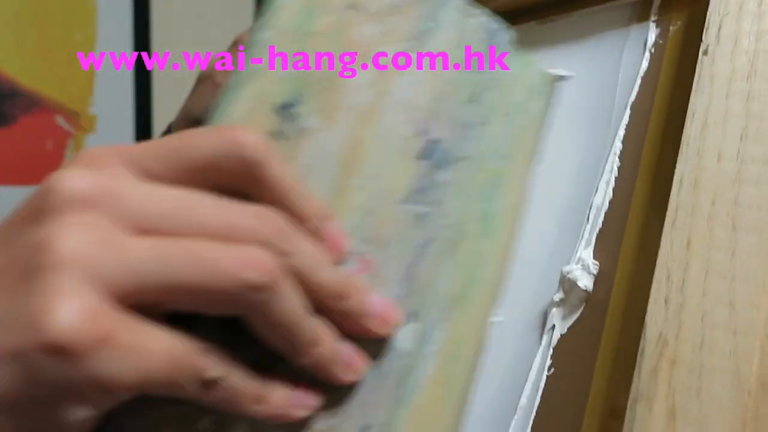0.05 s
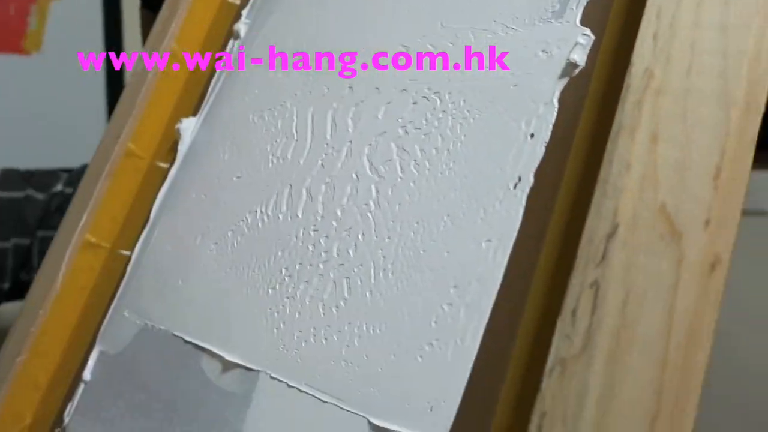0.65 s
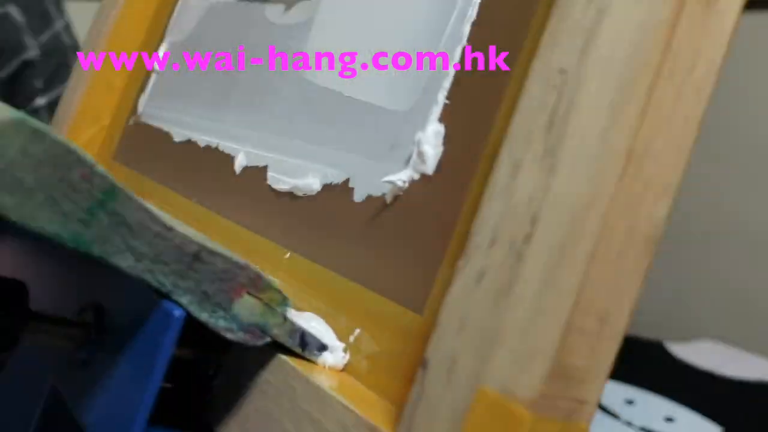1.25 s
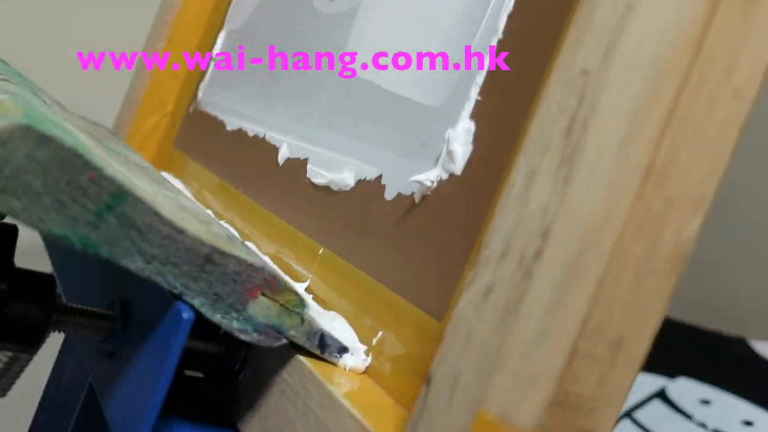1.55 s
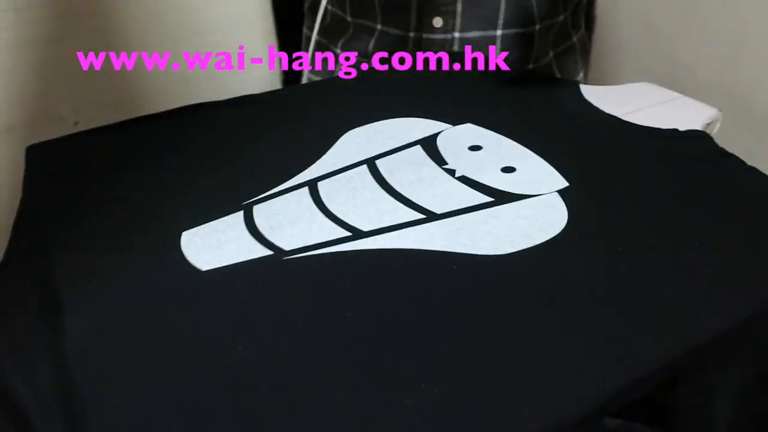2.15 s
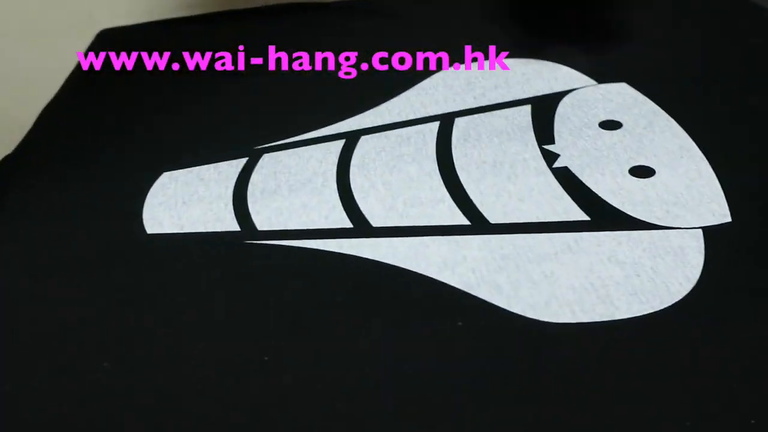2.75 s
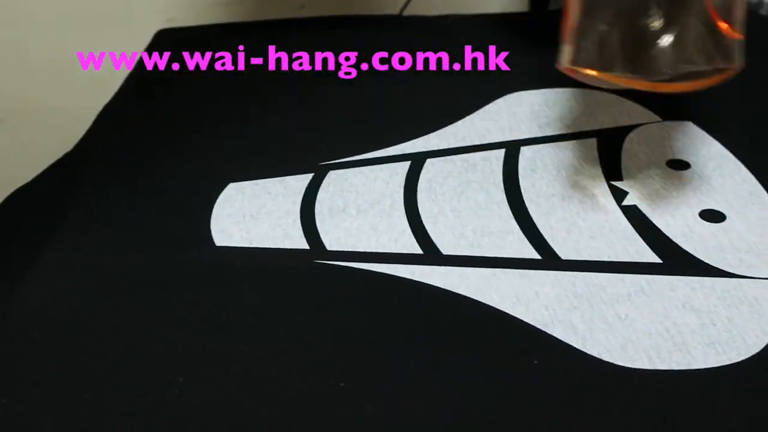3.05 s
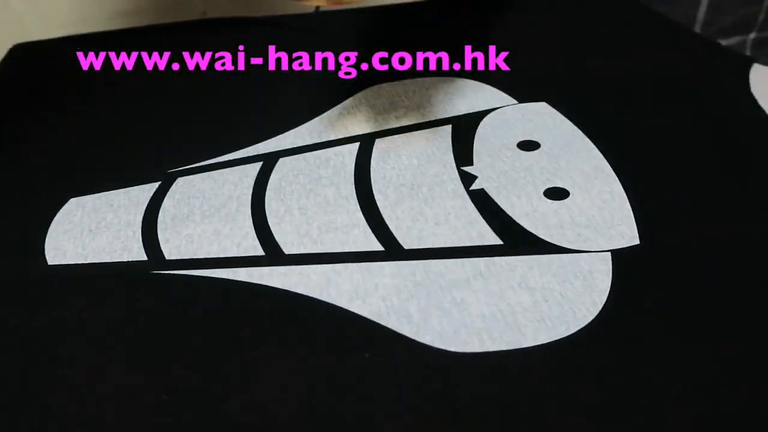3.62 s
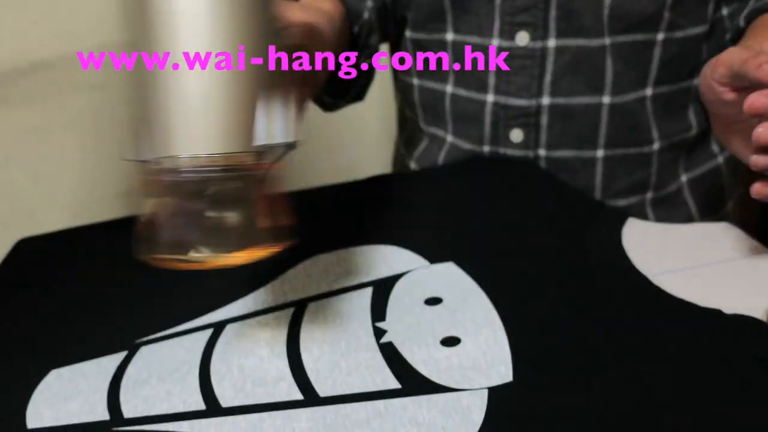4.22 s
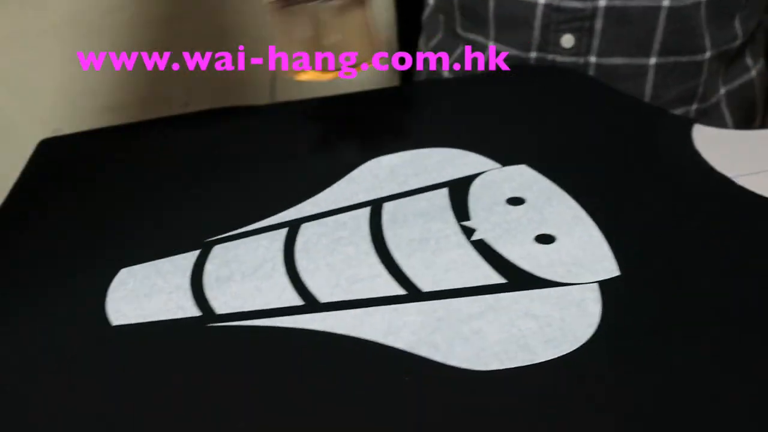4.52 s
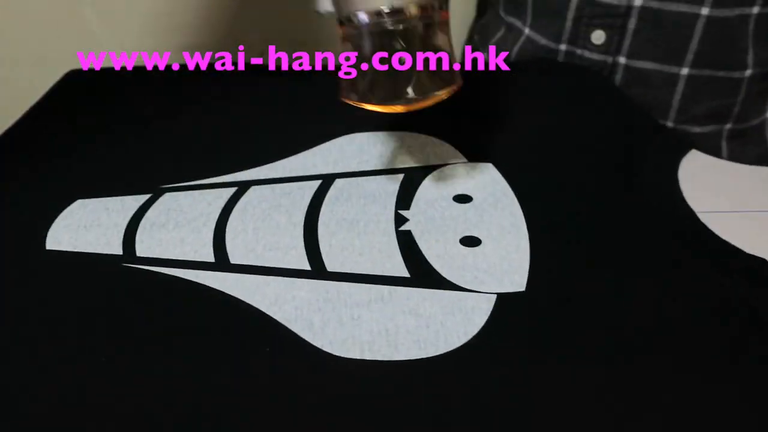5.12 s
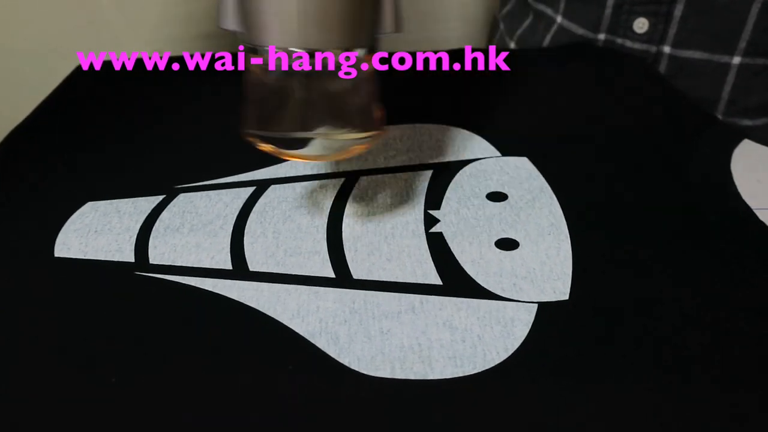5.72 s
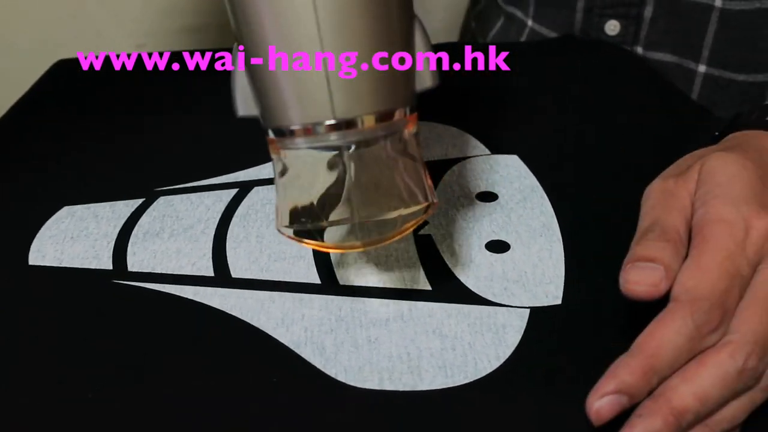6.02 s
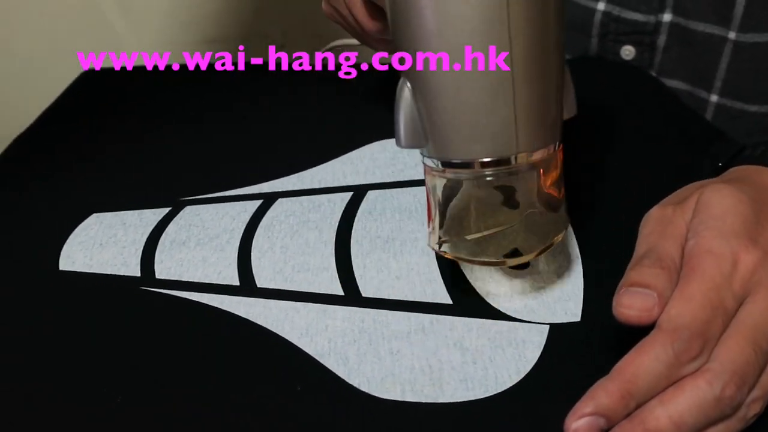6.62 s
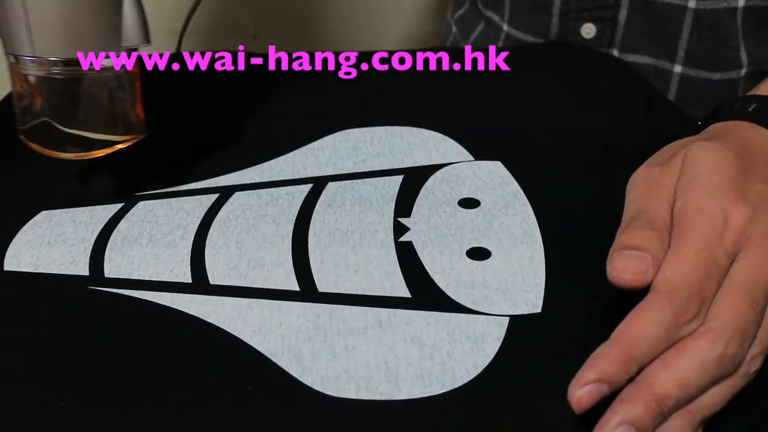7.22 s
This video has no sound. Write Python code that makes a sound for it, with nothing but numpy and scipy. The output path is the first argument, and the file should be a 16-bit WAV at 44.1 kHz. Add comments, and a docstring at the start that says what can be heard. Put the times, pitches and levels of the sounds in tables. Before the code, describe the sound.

A light wooden knock opens the scene, heard close up in a small room with a faint hum. A squeegee scrapes briefly across a printing screen at about 0.3 seconds, with a soft rumble from the taut mesh. It knocks against the wooden frame at 0.5 seconds and clatters again near 0.9. A sharper knock comes at about 1.6 seconds, surrounded by light clicks and rubbing as the frame is lifted.

At about 2 seconds a hair dryer clicks on and spins up rapidly. It runs to the end, around 7.5 seconds, with an airy roar, a hiss and a high fan whine whose tones swell and fade as it is waved about. The sound grows louder and brighter around 3 to 4 seconds. Soft gusts buffet a shirt now and then, most clearly around 6 to 6.7 seconds, when the dryer comes closest.

```python
"""A hair dryer spins up and is waved over a printed shirt: its fan whines in harmonics of the rotation,
turbulence roars in the duct, and the jet hisses and buffets the cloth. The tones swell and fade as
direct and reflected waves interfere. Before it starts, a wooden screen-printing frame is handled:
a squeegee wipes ink, knocks and is set down, and the frame is lifted, its taut mesh rumbling.
The small room hums faintly throughout."""
import sys
import numpy as np
from scipy import signal
from scipy.fft import rfft, irfft
from scipy.io import wavfile

SR = 44100
rng = np.random.default_rng(int(sys.argv[2]) if len(sys.argv) > 2 else 0)


def wav_out(sig):
    """Save sig, one row per channel (or a flat mono array), as 16-bit PCM at SR to the path in sys.argv[1]."""
    wavfile.write(sys.argv[1], SR, np.round(np.clip(np.atleast_2d(sig).T, -1, 1) * 32767).astype(np.int16))


N = 328986
TIME = np.arange(N) / SR
SWITCH_ON_S = 1.952
# poses of the dryer: (start t/s, end t/s, length of the move/s)
OVER_SHIRT, TILTED, HELD_LOW = (2.56, 9, .45), (2.82, 3.94, .057), (5.9, 6.97, .16)
# full rotation rate of the fan, sagging a little after the start: (t/s, f/Hz)
FULL_SPEED = [(2.2, 899), (2.5, 901), (3.3, 895), (3.7, 893), (4.6, 885), (5.7, 889.5), (7.3, 887),
              (7.46, 883)]
# blows on wood: (t/s, frame level/dB, squeegee level/dB, bench level/dB, crack level/dB, rattle/s)
BLOWS = [(0.001, -57.5, -57.5, -57, -61, 0.024), (0.4995, -62, -48.5, -73, -48, 0.0097),
         (0.505, -48, -52, -51.5, -66, 0.042), (0.8472, -64, -65, -74, -64, 0.014),
         (0.862, -66, -69, -60, -71, 0.016), (0.8948, -50.5, -39.5, -55, -56, 0.025),
         (0.919, -53, -57, -51.5, -60, 0.01), (0.926, -49, -62, -42, -62, 0.0054),
         (1.0965, -70, -75, -57.5, -80, 0.0082), (1.5593, -36.5, -53, -78, -51, .005),
         (1.704, -68.5, -76, -87, -60, 0.0088)]


def fan_tones(whine_harmonic=4, beaming_hz=5500, hand_m_per_s=.55, steadying=.733):
    """A rotor radiates harmonics of its rotation; short, weakly aimed waves flutter most. In stereo."""
    # (harmonic number, level/dB, change when tilted/dB, change when held low/dB)
    harmonics = [(1, -71.5, 2, 0.5), (2, -70, -1, 1), (3, -79, -10, 12), (4, -51, -0.5, -0.5),
                 (5, -59, 1.5, -4), (6, -66.5, 0, -0.5), (7, -50.5, 3.5, -4.5), (8, -64, 1, -3),
                 (9, -66.5, 3.5, 9), (10, -72.5, 6.5, -5), (11, -71, 2, 2), (12, -70.5, 1, -5),
                 (13, -73, 2, -2), (14, -73.5, 0, 2), (16, -75.5, 0, 6), (17, -80, 7, -3)]
    # directivity of the main whine as the aim changes: (t/s, level/dB)
    whine_aim = [(2.2, -5.5), (3.1, 0), (3.82, -1), (4.28, 6.5), (4.42, -8), (4.82, -4.5), (4.93, 3),
                 (6.2, -3.5), (6.9, 1.5), (7.22, -2.5), (7.28, -14), (7.46, -9)]
    # peaks and dips from duct resonances and standing waves in the room:
    # (t/s, harmonic number, half-length/s, level change/dB)
    swells = [(2.05, 4, 0.021, 12.5), (2.103, 4, 0.021, 14), (2.104, 7, 0.059, -13), (2.114, 3, 0.048, 18),
              (2.174, 4, 0.0082, 10.5), (2.25, 8, .2, 6), (2.27, 7, 0.045, -16), (2.45, 6, 0.15, 10),
              (2.727, 7, 0.17, -6.5), (3.172, 7, 0.052, -7), (4.173, 7, .22, -11.5), (4.537, 4, .04, -10),
              (4.643, 7, 0.042, -17), (4.662, 4, 0.029, 7), (4.75, 4, .02, -11), (5.117, 7, 0.044, -17),
              (5.28, 7, 0.04, -16), (5.436, 7, 0.021, -17)]
    tilted, low, far = during(*TILTED), during(*HELD_LOW), 1 - during(*OVER_SHIRT)
    waving = 1 - steadying * during(HELD_LOW[0], 2 * TIME[-1], HELD_LOW[2])  # calmer once lowered
    angle = fan_angle()
    travel_m = np.cumsum(hand_m_per_s * waving * (1 + .2 * drift(1.59))) / SR
    run_up_db = 13 * np.log10(run_up())  # times k below: higher harmonics enter later
    out = np.zeros((2, N))
    for k, db, tilted_db, low_db in harmonics:
        hz = k * np.mean(FULL_SPEED, axis=0)[1]
        aim_db = tilted_db * tilted + low_db * low
        aim_db += sum(change_db * swell(s, half_s, half_s)
                      for s, harmonic, half_s, change_db in swells if harmonic == k)
        if k == whine_harmonic:
            aim_db += in_time(whine_aim)
        far_db = -9 if k <= 2 else -2
        level_db = db + aim_db + k * run_up_db + far * far_db + 1.32 * drift(22)
        reflected_share = .27 * np.sqrt(waving) * min(hz / beaming_hz, 2) * from_db(-.72 * aim_db)
        flutter = interference(hz, travel_m, reflected_share)
        wave = np.real(flutter * np.exp(1j * (k * angle + rng.uniform(0, 2 * np.pi))))
        pan_db = .1 * min(hz / beaming_hz, 1) * drift(4.5)
        out += np.sqrt(2) * wave * from_db([level_db + pan_db, level_db - pan_db])
    return out


def fan_angle(wobble=.000912, wander=.000597):
    """Phase is the integral of the rotation rate, which rises, sags and wavers."""
    turns_per_s = in_time(FULL_SPEED) * run_up() * (1 + wobble * drift(24.7) + wander * drift(3))
    return 2 * np.pi * np.cumsum(turns_per_s) / SR


def run_up(time_constant_s=.111):
    """Steady torque against quadratic air drag: the share of full speed follows a tanh."""
    return np.maximum(np.tanh((TIME - SWITCH_ON_S) / time_constant_s), 1e-6)


def interference(hz, travel_m, share, sound_m_per_s=343):
    """Superposition: a direct wave beats against reflections whose paths change as the hand travels."""
    # paths by table, wall and body: (change of length per unit of hand travel, relative amplitude)
    paths = [(1.2, 1.4), (-.8, 0.57), (.45, 0.56)]
    wavelengths = travel_m * hz / sound_m_per_s
    reflected = sum(gain * np.exp(2j * np.pi * (slant * wavelengths + rng.random()))
                    for slant, gain in paths)
    mean_power = 1 + share ** 2 * sum(gain ** 2 for _, gain in paths)
    return (1 + share * reflected) / np.sqrt(mean_power)


def dryer_noise(buzz_hz=400, buzz_db=-81, delay_s=.017):
    """Flow noise and the motor's mains buzz set in just after the switch closes."""
    running = np.clip((TIME - SWITCH_ON_S - delay_s) * 20, 0, 1)
    buzz = np.sqrt(2) * from_db(buzz_db + 2 * drift(.62)) * np.sin(2 * np.pi * buzz_hz * TIME)
    airflow = duct_roar() + nozzle_hiss() + cloth_buffeting()
    return running * (early_reflections(airflow) + buzz)


def duct_roar(resonant_db=-2, broadband_db=-3):
    """Turbulence excites the resonances of the air passage, louder as the dryer comes closer."""
    # duct resonances: (f/Hz, bandwidth/Hz, level/dB)
    modes = [(512, 48, -14.5), (748, 20.4, -5.5), (919, 25, -8.5), (1125, 95, -10.5), (1570, 410, -24.5),
             (1814, 420, -12), (1950, 250, -11.5), (2352, 93, -1), (2750, 215, 0), (3118, 89, 3.5),
             (3385, 420, -5.5)]
    # turbulence spectrum: (f/Hz, level/dB)
    spectrum = [(100, -53), (300, -28), (700, -25), (1400, -16), (2100, -9), (2400, -6.5), (3200, 1),
                (3700, -6.5), (4600, -12.5), (6500, -21), (15000, -42)]
    # strength of the roar with changing distance: (t/s, level/dB)
    closeness = [(2.1, -56), (2.3, -57.5), (2.55, -57.5), (2.85, -51.5), (2.96, -55), (3.17, -51),
                 (3.4, -53), (4.27, -50.5), (4.45, -53.5), (4.98, -51), (5.2, -52.5), (5.95, -49),
                 (6.75, -48.5), (7.05, -52.5), (7.24, -49.5), (7.46, -53.5)]
    level_db = in_time(closeness) + 20 * np.log10(run_up()) + .95 * drift(25) + .48 * drift(5.8)
    roar = from_db(resonant_db) * resonant_noise(modes) + from_db(broadband_db) * noise(spectrum)
    return from_db(level_db) * roar


def nozzle_hiss(jet_db=-54, rim_db=-72):
    """Treble is directional: jet hiss and rim sizzle grow as the nozzle tilts towards the listener."""
    # jet spectrum: (f/Hz, level/dB)
    spectrum = [(500, -16.5), (2000, 3.5), (4000, -4.5), (5000, 0.5), (5900, 3.5), (6800, 3.5), (8400, 1),
                (9600, 3.5), (10400, -2), (11500, 1), (12900, -3), (14300, 0), (16000, -3.5)]
    # rim resonances: (f/Hz, bandwidth/Hz, level/dB)
    rim_modes = [(10500, 570, 1), (11670, 800, 1)]
    tilted, far = during(*TILTED), 1 - during(*OVER_SHIRT)
    jet = from_db(jet_db + 1.3 * tilted - far + 1.25 * drift(11)) * noise(spectrum)
    rim = from_db(rim_db + 11 * tilted) * resonant_noise(rim_modes)
    return run_up() ** 1.5 * (jet + rim)


def cloth_buffeting(steady_db=-78, flapping_db=1.5):
    """The jet strikes the shirt; its steady rumble and its gusts add in power."""
    # the jet catches the cloth: (t/s, half-length/s, level/dB)
    gusts = [(2.91, 0.08, -68.5), (3.13, .07, -65.5), (3.676, 0.31, -67.5), (4.1, 0.41, -74.5),
             (4.957, 0.072, -73), (5.326, 0.13, -74), (5.556, 0.074, -70), (6.195, 0.2, -64),
             (6.534, 0.2, -69.5), (7.205, 0.046, -79)]
    # buffeting spectrum: (f/Hz, level/dB)
    spectrum = [(40, -33), (110, -25), (180, 6), (255, 2.5), (420, 8.5), (700, -6), (2000, -35)]
    power = (from_db(steady_db) * run_up()) ** 2
    power += sum((from_db(db) * swell(s, half_s, half_s)) ** 2 for s, half_s, db in gusts)
    return np.sqrt(power) * from_db(flapping_db * drift(8)) * noise(spectrum)


def early_reflections(x, share=.26, sway_s=.0002):
    """Comb filtering: nearby surfaces return the sound with delays that vary as the hand moves."""
    out = x.copy()
    oversampled = signal.resample_poly(x, 4, 1)
    for lag_s in (.0013, .0034, .0071):
        position = (TIME - lag_s - sway_s * drift(.73)) * SR * 4
        out += share * np.interp(position, np.arange(len(oversampled)), oversampled)
    return out / np.sqrt(1 + 2 * share ** 2)


def wood_knocks(body_db=-5, crack_hz=3000, bass_cut_hz=170):
    """An impulse and a rattle of the joints excite the modes of three bodies, with a dry crack on top."""
    # modes of each body: (f/Hz, level/dB, T60/s)
    frame = [(415, -6.5, 0.037), (532, -6.5, 0.19), (617, -10, 0.23), (700, -8, 0.066), (825, -3, 0.1),
             (1058, -1, 0.051), (1200, -4, 0.031), (1350, -1, 0.038), (1516, -0.5, 0.056),
             (1892, -1, 0.029), (2110, -12, 0.037), (2870, -21, 0.095), (3730, -9.5, 0.016)]
    squeegee = [(474, -3.5, 0.11), (970, -10, 0.094), (1150, -2, .06), (1359, -11.5, 0.059),
                (1702, -1.5, 0.057), (1780, -10, .06), (2070, -6.5, 0.051), (2430, 4, 0.01),
                (3260, -11.5, 0.025), (3950, -6.5, .022), (6140, -14, 0.013)]
    bench = [(181.5, -22.5, 0.49), (257, -49, 0.24), (322, -13, 0.18), (423, -20.5, 0.8), (565, 2, 0.11),
             (580, -16, .45), (733, -4.5, 0.12)]
    crack_lowpass = signal.butter(1, crack_hz, fs=SR, output="sos")
    out = np.zeros(N)
    for s, frame_db, squeegee_db, bench_db, crack_db, rattle_s in BLOWS:
        rattle = decaying_noise(4 * rattle_s)
        force = rattle / np.linalg.norm(rattle)
        force[0] += 1
        for modes, db in ((frame, frame_db), (squeegee, squeegee_db), (bench, bench_db)):
            add(out, s, from_db(db + body_db) * ring(force, modes))
        crack = signal.sosfilt(crack_lowpass, decaying_noise(t60=.062))
        add(out, s, from_db(crack_db) * crack)
    # a high-pass takes away the lowest frequencies of the knocks
    return signal.sosfilt(signal.butter(2, bass_cut_hz, "high", fs=SR, output="sos"), out)


def clicks(gain_db=-1):
    """Each light contact excites one broad, heavily damped resonance."""
    # hinge, plastic handle and switch: (t/s, level/dB, f/Hz, bandwidth/Hz, T60/s)
    contacts = [(1.349, -63, 10500, 11000, 0.13), (1.350, -65.5, 1600, 1500, 0.13),
                (1.616, -68.5, 8300, 9100, 0.2), (1.728, -69.5, 7500, 4000, 0.13),
                (1.802, -62.5, 8340, 3500, .1), (1.91, -58.5, 1060, 300, 0.069),
                (1.910, -75, 2900, 5000, .08), (1.934, -64, 2660, 1500, 0.11),
                (1.954, -65, 3570, 250, 0.07), (1.987, -60, 5500, 8000, 0.061),
                (2.013, -62, 3600, 700, .08), (2.034, -55.5, 900, 450, 0.043)]
    out = np.zeros(N)
    for s, db, hz, width_hz, t60 in contacts:
        burst = resonance(decaying_noise(t60), hz, width_hz)
        add(out, s, from_db(db + gain_db) * burst / np.std(burst[:SR // 100]))
    return out


def rubbing(scrape_db=-4, swish_db=-1, grain_db=3.5):
    """Sliding friction of rubber and wood makes an uneven, grainy noise."""
    # spectra of the low scrape and the fine swish: (f/Hz, level/dB)
    scrape_spectrum = [(100, -15), (250, -13), (700, 8), (1900, 11), (3000, 0), (6000, -23)]
    swish_spectrum = [(1000, -32), (3000, 6), (5000, -5), (8000, -2), (12000, -9), (16000, -8)]
    scrape_envelope, swish_envelope = stroke_envelopes()
    grain = from_db(grain_db * drift(60))
    scrape = scrape_envelope * from_db(scrape_db) * noise(scrape_spectrum)
    swish = swish_envelope * from_db(swish_db) * noise(swish_spectrum)
    return grain * (scrape + swish)


def stroke_envelopes():
    """Friction noise rises and falls with each stroke: the amplitudes of scrape and swish."""
    # squeegee strokes and frame slides: (peak t/s, rise/s, fall/s, scrape level/dB, swish level/dB)
    strokes = [(0.23, .05, .06, -79.5, -91), (0.345, 0.056, 0.038, -68, -75.5),
               (0.475, 0.035, 0.029, -75, -77), (0.86, .025, .06, -73, -87), (1.2, 0.13, .14, -81.5, -86),
               (1.53, .02, 0.17, -72, -77), (1.79, 0.032, 0.11, -71.5, -75), (1.98, 0.067, .025, -80, -71)]
    return sum(from_db([[scrape_db], [swish_db]]) * swell(s, rise_s, fall_s)
               for s, rise_s, fall_s, scrape_db, swish_db in strokes)


def mesh_rumble(held_db=-79.5, scrape_db=-.5, jolt_db=-16, t60=.45, squeegee_off_s=1, frame_up_s=1.95):
    """The taut mesh is a membrane, driven by hands and scraping and ringing on after each bench jolt."""
    # membrane modes: (f/Hz, bandwidth/Hz, level/dB)
    modes = [(175, 23, -14.5), (244.7, 6.9, 8.5), (297, 12, -4.5), (340, 95, -7)]
    held = from_db(held_db) * np.clip((frame_up_s - TIME) * 10 + 1, 0, 1)
    scraped = from_db(scrape_db) * stroke_envelopes()[0] * (TIME < squeegee_off_s)
    power = held ** 2 + scraped ** 2
    for s, _, _, bench_db, _, _ in BLOWS:
        ring_db = min(bench_db, -54) + jolt_db - 60 * np.abs(TIME - s) / t60
        power += from_db(ring_db) ** 2 * (TIME >= s)
    return np.sqrt(power) * resonant_noise(modes)


def reverberation(x, wet_db=-15, build_s=.0033):
    """The room's diffuse field builds up quickly and decays faster in the treble."""
    # reverberation time: (f/Hz, T60/s)
    decay = [(150, 0.4), (500, 0.38), (1500, 0.16), (4000, 0.075), (12000, 0.096)]
    edges_hz = np.geomspace(90, 16000, num=8)
    tail = np.zeros(SR)
    for low, high in zip(edges_hz, edges_hz[1:]):
        band = signal.butter(2, [low, high], "band", fs=SR, output="sos")
        tail += signal.sosfilt(band, decaying_noise(at_hz(decay, np.sqrt(low * high)), length_s=1))
    tail *= 1 - np.exp(-TIME[:SR] / build_s)
    return from_db(wet_db) * signal.fftconvolve(x, tail / np.linalg.norm(tail))[:N]


def background(rumble_db=-75.5, waver_db=2):
    """Broadband room rumble lies under an appliance hum, modulated in amplitude and phase."""
    # rumble spectrum: (f/Hz, level/dB)
    spectrum = [(20, -21), (50, -15), (80, -7), (100, 7), (125, -0.5), (155, -2), (250, -1.5), (350, -6),
                (600, -2.5), (1100, -4.5), (2500, -13.5), (6000, -31), (15000, -48)]
    # hum partials: (f/Hz, level/dB)
    partials = [(98, -87), (120, -85), (400, -100), (572, -83.5), (800, -85), (1200, -88.5), (2000, -95)]
    hum = np.zeros(N)
    for hz, db in partials:
        amplitude = np.sqrt(2) * from_db(db + waver_db * drift(3.1))
        hum += amplitude * np.sin(2 * np.pi * hz * TIME + .5 * drift(3.1))
    return from_db(rumble_db) * noise(spectrum) + hum


def from_db(db):
    """Level to amplitude ratio."""
    return 10 ** (np.asarray(db) / 20)


def unit_rms(x):
    """Normalise to a mean power of 1."""
    return x / np.sqrt(np.mean(x ** 2) + 1e-20)


def in_time(points):
    """Interpolate (t/s, value) points at every sample."""
    return np.interp(TIME, *np.transpose(points))


def at_hz(points, hz):
    """Interpolate (f/Hz, value) points on a logarithmic frequency axis."""
    known_hz, values = np.transpose(points)
    return np.interp(np.log(np.maximum(hz, 1)), np.log(known_hz), values)


def swell(s, rise_s, fall_s):
    """A Gaussian bump of height 1 with unequal flanks."""
    flank_s = np.where(TIME < s, rise_s, fall_s)
    return np.exp(-np.minimum(((TIME - s) / flank_s) ** 2, 50))


def during(from_s, to_s, move_s):
    """A smooth window, 1 while a pose is held."""
    return (np.tanh(2 * (TIME - from_s) / move_s) - np.tanh(2 * (TIME - to_s) / move_s)) / 2


def drift(rate_hz, hop=40):
    """Low-passed noise: a smooth random wandering of unit rms."""
    pole = np.exp(-2 * np.pi * hop * rate_hz / SR)
    slow = signal.lfilter([1], [1, -2 * pole, pole * pole], rng.standard_normal(N // hop + 2002))[2000:]
    return np.interp(np.arange(N) / hop, np.arange(len(slow)), unit_rms(slow))


def coloured(x, spectrum, size=2 ** 19):
    """Filter by multiplication in the frequency domain."""
    hz = np.arange(size // 2 + 1) * SR / size
    return irfft(rfft(x, size) * from_db(at_hz(spectrum, hz)))[:N]


def noise(spectrum):
    """Coloured noise of unit rms."""
    return unit_rms(coloured(rng.standard_normal(N), spectrum))


def decaying_noise(t60, length_s=.5):
    """White noise decaying exponentially, 60 dB in t60 seconds."""
    t = np.arange(int(length_s * SR)) / SR
    return rng.standard_normal(len(t)) * np.exp(-np.log(1000) * t / t60)


def resonance(x, hz, width_hz):
    """A two-pole resonator with a peak gain of 1."""
    r = np.exp(-np.pi * width_hz / SR)
    feedback = [1, -2 * r * np.cos(2 * np.pi * hz / SR), r * r]
    return signal.lfilter(np.array([1, 0, -1]) * (1 - r * r) / 2, feedback, x)


def resonant_noise(modes):
    """Random forcing of parallel resonators, scaled to unit rms."""
    drive = rng.standard_normal(N)
    return unit_rms(sum((-1) ** k * from_db(db) * resonance(drive, hz, width_hz)
                        for k, (hz, width_hz, db) in enumerate(modes)))


def ring(force, modes):
    """Modal response: a force convolved with damped sinusoids of alternating sign."""
    t = np.arange(SR // 2) / SR
    response = sum((-1) ** k * from_db(db) * np.sin(2 * np.pi * hz * t) * np.exp(-np.log(1000) * t / t60)
                   for k, (hz, db, t60) in enumerate(modes))
    return signal.fftconvolve(force, response)


def add(track, s, sound):
    """Superpose a sound on a track, starting at s seconds."""
    start = max(round(s * SR), 0)
    track[start:start + len(sound)] += sound[:N - start]


def scene(self_noise_db=-82):
    """All sources superpose at two close microphones, which differ mainly in diffuse treble and hiss."""
    # side signal relative to mid: (f/Hz, level/dB)
    width = [(100, -46), (350, -73), (650, -27), (1000, -51), (2600, -90), (3600, -16.5), (9000, -29.5),
             (12000, -56), (13500, -6), (15500, -10.5)]
    # self-noise spectrum of each microphone: (f/Hz, level/dB)
    hiss = [(100, -31), (500, 3.5), (1000, -4), (2000, -13), (4000, 5.5), (8000, -1), (12000, -3.5),
            (15000, -9)]
    handling = wood_knocks() + clicks()
    mid = handling + reverberation(handling) + rubbing() + mesh_rumble() + dryer_noise() + background()
    diffuse = decaying_noise(t60=.18, length_s=.15)
    scattered = signal.fftconvolve(mid, diffuse / np.linalg.norm(diffuse))[:N]
    side = coloured(scattered, width)
    self_noise = from_db(self_noise_db) * np.array([noise(hiss), noise(hiss)])
    return np.array([mid + side, mid - side]) + fan_tones() + self_noise


def record(dry, cutoff_hz=15700):
    """An elliptic low-pass filter cuts the highest treble steeply."""
    return signal.sosfilt(signal.ellip(12, .1, 70, cutoff_hz, fs=SR, output="sos"), dry)


dry = scene()
out = record(dry)
wav_out(out)
```